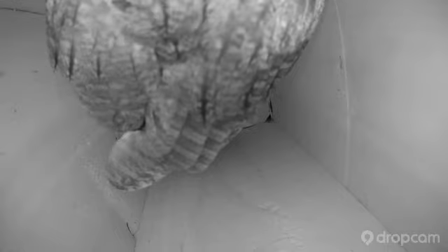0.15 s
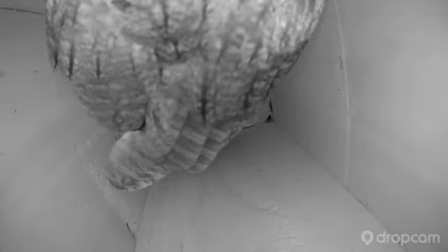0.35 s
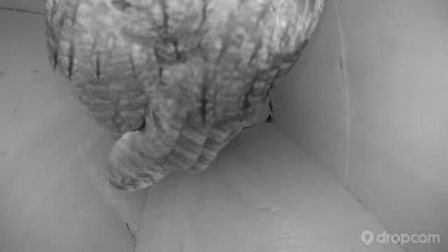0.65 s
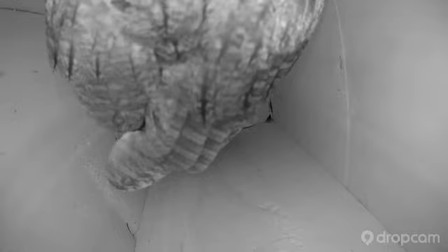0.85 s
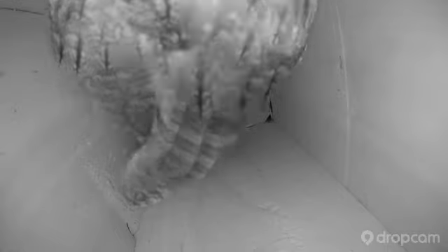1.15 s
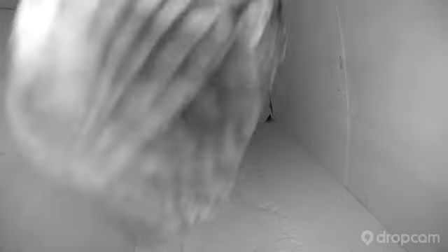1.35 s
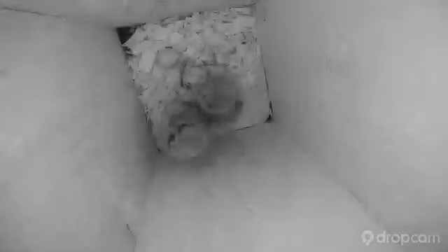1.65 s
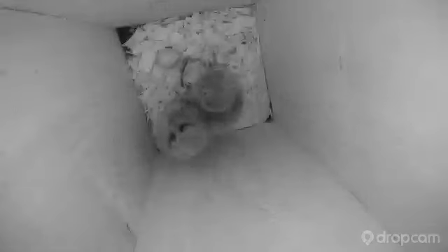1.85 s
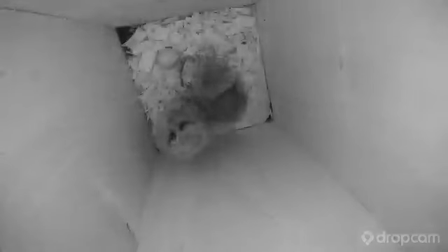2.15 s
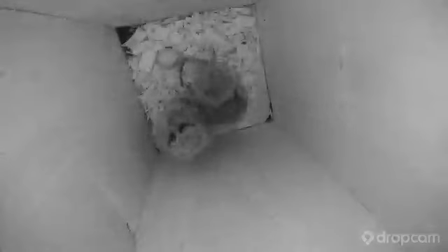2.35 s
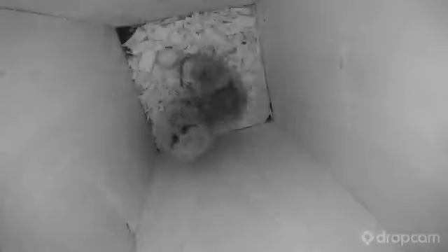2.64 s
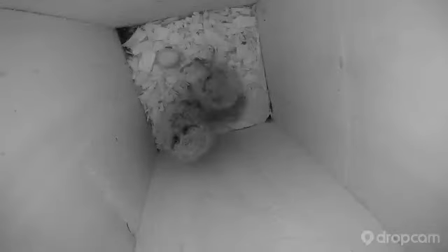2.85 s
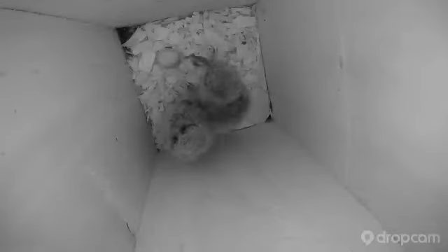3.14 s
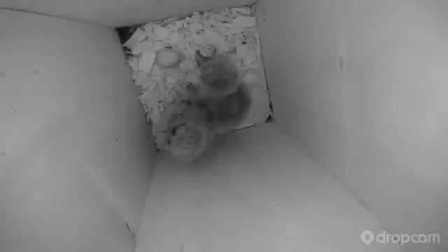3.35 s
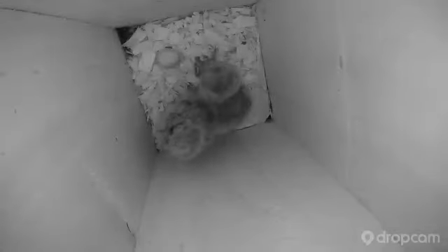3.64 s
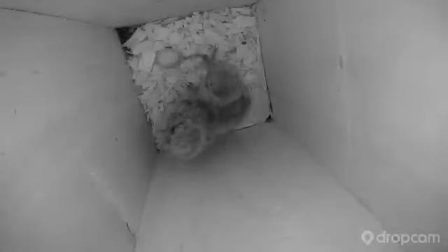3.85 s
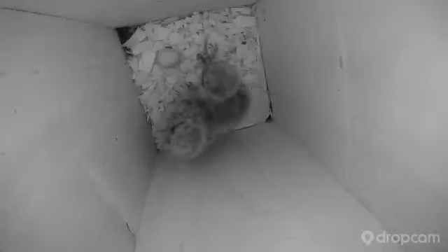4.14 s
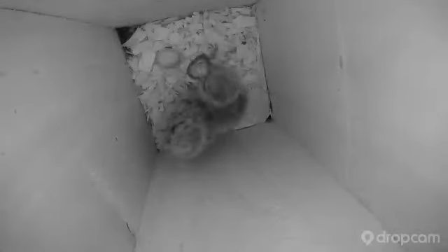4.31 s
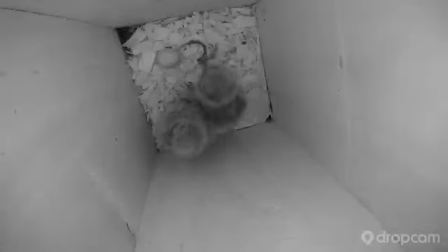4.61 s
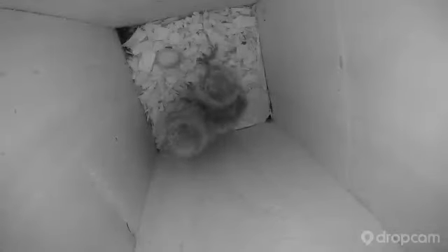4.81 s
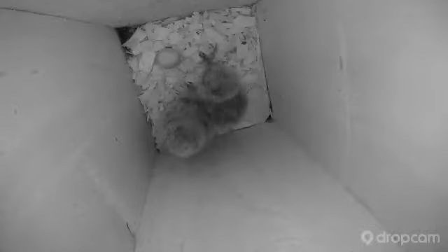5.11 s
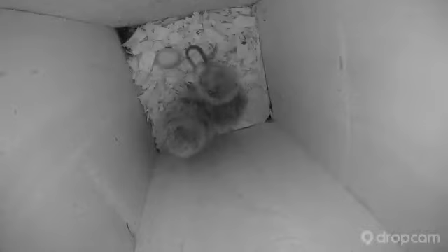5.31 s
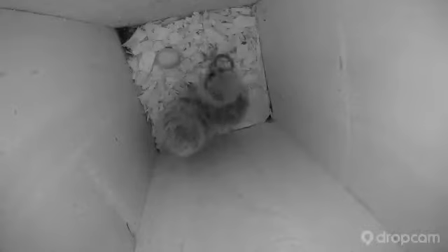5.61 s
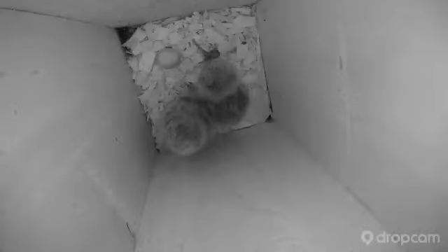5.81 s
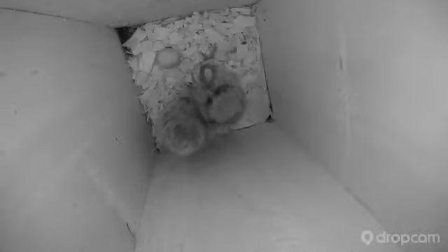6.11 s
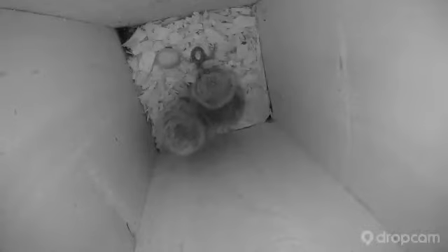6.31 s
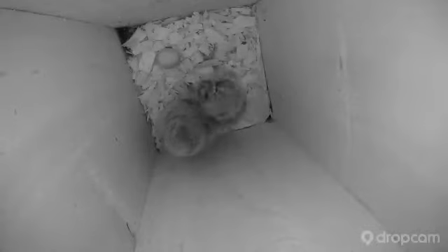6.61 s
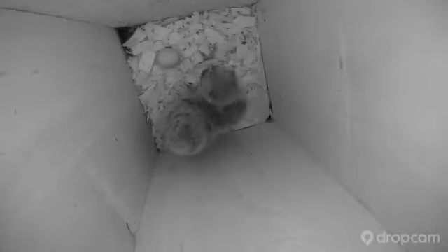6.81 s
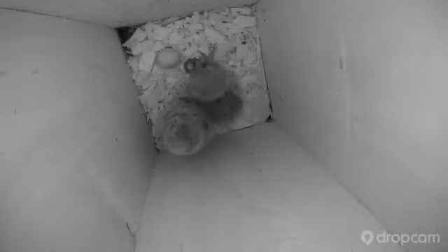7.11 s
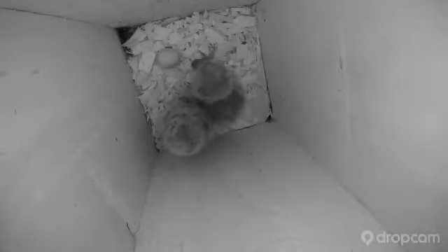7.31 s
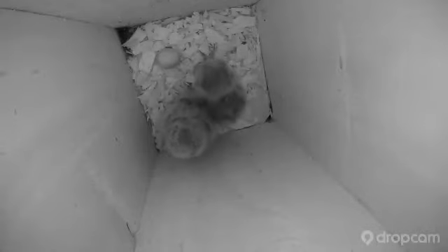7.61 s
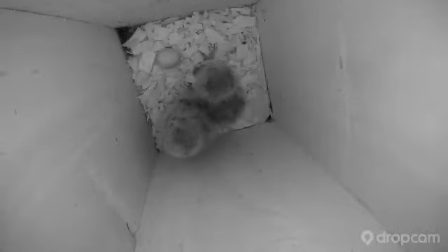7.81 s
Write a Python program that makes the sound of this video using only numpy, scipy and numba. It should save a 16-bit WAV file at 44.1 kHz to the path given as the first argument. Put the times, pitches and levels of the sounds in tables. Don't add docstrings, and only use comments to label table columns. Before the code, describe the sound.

Feathers rustle and thump as a parent bird leaves a wooden nest box, then owlets give three raspy begging hisses amid small scuffs.

```python
import sys
import numpy as np
from scipy import signal
from scipy.fft import rfft, irfft, dct, next_fast_len
from scipy.io import wavfile
from scipy.ndimage import uniform_filter1d
from numba import njit

SR = 44100
rng = np.random.default_rng(int(sys.argv[2]) if len(sys.argv) > 2 else 0)


def gain_from_db(level_db):
    decades = np.asarray(level_db, float) / 20
    return 10 ** decades


def wrap_up_sound(samples):
    columns = np.atleast_2d(samples).T
    tamed = np.clip(columns, -1, 1)
    steps = np.round(tamed * 32767).astype(np.int16)
    wavfile.write(sys.argv[1], SR, steps)


N = 351036
TIME = np.arange(N) / SR

# (frequency [Hz], level [dB])
HISS_SPECTRUM = [(12, -60), (20, -27.5), (339, -20.5), (455, -12), (541, -15.5), (1080, -19), (1280, -17.5),
                 (1520, -17.5), (2430, -18.5), (3340, -14.5), (3780, -19), (6650, -29), (7160, -37.5),
                 (9310, -47.5), (15800, -120)]


def begging_chick():
    # (frequency [Hz], width [Hz], level [dB])
    hiss_modes = [(1267, 41, -5), (2451, 110, -2.5), (2847, 90, -4), (3130, 110, -1.5), (3530, 10, -17.5),
                  (3600, 44, -12), (3920, 89, -4.5), (4220, 13, -29), (4530, 240, -7.5), (5350, 42, -11),
                  (5384, 150, -11), (5760, 120, -14.5), (6553, 300, -15)]
    # (frequency [Hz], width [Hz], level [dB])
    boom_modes = [(451.3, 52, -1), (301.6, 69, -20)]
    # (frequency [Hz], width [Hz], level [dB])
    lean_modes = [(952, 170, 0)]
    # (frequency [Hz], width [Hz], level [dB])
    cross_modes = [(1280, 110, 0)]

    (hiss, boom, throat, lean), throat_hz, upper_hz = breath()
    flutter = noise() * gain_from_db(2.9 * walk(260))
    wheeze = noise() * gain_from_db(3 * walk(260))

    broad = gain_from_db(-1.8) * colour(flutter, HISS_SPECTRUM)
    broad = broad + gain_from_db(-5.5) * ring(flutter, hiss_modes, flicker_db=2.5)
    away = lean / (lean + 2.5 * hiss + 1e-9)
    dull = signal.lfilter(*signal.butter(1, 3500, fs=SR), broad)
    broad = (1 - away) * broad + away * dull

    cross_gain = gain_from_db(-9.5) * hiss ** 2 / (hiss + 1.5 * lean + 1e-9)
    out = cross_gain * ring(flutter, cross_modes, order=2)
    out = out + gain_from_db(-8) * hiss * throat_band(flutter, upper_hz, 160)
    out = out + gain_from_db(5.5) * hiss * broad
    out = out + gain_from_db(-1.1) * boom * ring(flutter, boom_modes, order=2)
    out = out + gain_from_db(1.0) * throat * throat_band(wheeze, throat_hz, 300)
    return out + gain_from_db(-2.5) * lean * ring(wheeze, lean_modes, order=2)


def breath():
    # (full voice [s], beak opens [s], fades [s], effort [dB])
    begs = [
        (1.985, 2.322, 2.54, -46),
        (4.666, 4.901, 5.105, -48.5),
        (7.368, 7.631, 7.692, -49),
    ]
    # (upper throat [Hz], throat before opening [dB], boom lost once open [dB/s])
    posture = [
        (3955, -2.5, 95.5),
        (3700, -2, 5.5),
        (3650, 7, 0),
    ]
    # (time [s], length [s], throat [dB], throat centre [Hz], box [dB])
    gulps = [
        (1.98, 0.0046, -49.5, 2100, -57),
        (4.644, .015, -49.5, 2365, -59.5),
        (5.16, .008, -40.5, 2150, -60.5),
        (5.18, 0.0053, -45.5, 2100, -49),
        (7.35, 0.0031, -58, 2225, -53.5),
        (7.366, .012, -45.5, 2420, -54),
        (7.72, .038, -40, 2186, -41),
        (7.794, .016, -39.5, 2230, -39),
    ]
    shut_hz, open_hz = 2420, 2267
    swell_db, gape_s, boom_lag_s = 4.5, .1, .012
    attack_db_s, fade_db_s = 3000, 550
    # hiss, boom, throat and lean mode [dB over the effort]
    shut = np.array([-0.5, 4, -9, -15])[:, None]
    wide = np.array([-3, 2, 0, -3.5])[:, None]

    gains = np.zeros((4, N))
    throat_hz = np.full(N, float(shut_hz))
    upper_hz = np.full(N, float(shut_hz))
    for (start, opens, end, db), (upper, throat_db, lost_db_s) in zip(begs, posture):
        gape = ramp(opens, gape_s)
        effort = db + swell_db * ramp(start, opens - start)
        effort = effort + shape(start, end, attack_db_s, fade_db_s)
        beg = gain_from_db(effort + shut + gape * (wide - shut))
        beg[1] *= gain_from_db(shape(start + boom_lag_s, opens, attack_db_s / 2, lost_db_s))
        beg[2] *= gain_from_db((1 - gape) * throat_db)
        gains += beg
        now = TIME > start - .1
        throat_hz[now] = (shut_hz + gape * (open_hz - shut_hz))[now]
        upper_hz[now] = upper
    for s, length, db, gulp_hz, box_db in gulps:
        levels = np.array([db - 9, box_db, db, box_db])[:, None]
        gains += gain_from_db(levels + shape(s, s + length, 3999, 901.5))
        throat_hz[(TIME > s - .01) & (TIME < s + 2 * length + .01)] = gulp_hz
    return gains, throat_hz, upper_hz


def sibling():
    # (time [s], level [dB])
    screech = [(2.27, -50.5), (2.34, -43), (2.375, -29), (2.47, -31), (2.55, -34.5), (2.588, -56.5),
               (2.602, -44), (2.63, -48), (2.66, -73)]
    # (frequency [Hz], width [Hz], level [dB])
    formants = [(2100, 380, -7.5), (2677, 160, -8), (2910, 71, -5), (3216, 350, -5), (3500, 85, -11)]
    start, end, from_db, to_db, whistle_hz = 2.41, 2.6, -8, 14.5, 2389
    rasp = noise() * gain_from_db(3.5 * walk(300))
    wheeze = noise() * gain_from_db(3 * walk(260))
    whistle_gain = gain_from_db(from_db + (to_db - from_db) * ramp(start, end - start))
    voice = ring(rasp, formants, flicker_db=2.5)
    voice = voice + whistle_gain * throat_band(rasp, whistle_hz, 160)
    voice = voice + gain_from_db(-12.5) * colour(wheeze, HISS_SPECTRUM)
    return gain_from_db(-1.3) * level_curve(screech) * voice


def parent():
    # (frequency [Hz], level [dB])
    rustle_spectrum = [(290, -28), (500, -4), (772, -5), (965, -2.5), (1510, -6), (1760, -2), (2660, -5),
                       (2870, -10.5), (3250, -4.5), (7160, -26.5), (9310, -61), (15800, -120)]
    # (time [s], length [s], box boom [dB], wall thump [dB])
    bumps = [
        (1.522, 0.029, -50, -67),
        (1.606, 0.017, -45.5, -64.5),
        (1.651, 0.013, -40.5, -45.5),
        (1.688, 0.0096, -43, -53),
        (3.549, .01, -57.5, -74),
        (3.807, .015, -54.5, -75),
        (6.438, .01, -59, -72),
    ]
    leaves_s, rustle_db, settle_db = 1.66, -42, -58
    growth_db_s, fall_db_s = 150, 699

    rustle = gain_from_db(rustle_db + shape(leaves_s, leaves_s, growth_db_s, fall_db_s))
    rustle = rustle + gain_from_db(settle_db + shape(leaves_s, leaves_s, growth_db_s / 3.1, fall_db_s / 7))
    boom, thump = np.zeros(N), np.zeros(N)
    for s, length, boom_db, thump_db in bumps:
        knock = shape(s, s + length, 503, 400.5)
        boom += gain_from_db(boom_db + knock)
        thump += gain_from_db(thump_db + knock)
    grains = noise() * gain_from_db(4.5 * walk(400))
    out = gain_from_db(0.9) * rustle * colour(grains, rustle_spectrum)
    out = out + boom * ring(noise(), [(431.7, 13, 0)])
    return out + gain_from_db(-0.5) * thump * ring(noise(), [(117, 22, 0), (289, 30, -9)])


def scuffs():
    # (time [s], peak [dB], colour [Hz], 60 dB decay [s])
    steps = [(2.7232, -48.5, 2000, 0.06), (2.7392, -41, 2340, 0.074), (2.7888, -49, 1730, 0.098),
             (2.9958, -49.5, 1780, 0.085), (3.1008, -52.5, 1720, 0.1), (3.145, -52.5, 4080, 0.08),
             (3.1842, -55, 2380, 0.23), (3.479, -41, 2270, 0.035), (3.5043, -43.5, 2510, 0.067),
             (3.7974, -51, 2490, 0.042), (3.8212, -48, 2470, 0.11), (4.0471, -47, 3130, 0.03),
             (4.2792, -46, 2930, 0.07), (4.2988, -46.5, 2450, 0.033), (4.3395, -49, 1880, 0.076),
             (5.2, -53.5, 2370, .04), (5.3161, -43, 2210, 0.05), (5.3374, -49.5, 2470, 0.032),
             (5.579, -57, 1650, 0.14), (5.7752, -54, 1720, 0.24), (5.8342, -48.5, 1920, 0.13),
             (6.3761, -55.5, 2200, 0.33), (6.4423, -39, 1950, 0.047), (6.8033, -48.5, 3700, 0.03)]
    rise_s = .003
    out, t = np.zeros(N), np.arange(SR // 4) / SR
    for s, db, hz, t60 in steps:
        crackle = rng.standard_normal(len(t))
        burst = (1 - np.exp(-t / rise_s)) * gain_from_db(-60 * t / max(t60, .01))
        body = signal.lfilter(*signal.iirpeak(hz, 1.6, SR), crackle)
        body = body + .15 * np.diff(crackle, prepend=0)
        i = int(s * SR)
        out[i:i + len(t)] += gain_from_db(db - 6.5) * burst / burst.max() * unit(body)
    return out


def outside_air():
    # (frequency [Hz], level [dB])
    shut_spectrum = [(12, -66), (20, -32.5), (76, -7), (154, -11), (183, -13), (383, -2.5), (412, -1.5),
                     (466, -7.5), (1640, -14), (5880, -27), (7160, -29.5), (9310, -65), (15800, -120)]
    # (frequency [Hz], level [dB])
    open_spectrum = [(12, -59), (20, -15), (79, -17), (118, -1), (202, -13.5), (356, -9), (383, -17),
                     (455, -8.5), (627, -13), (1410, -17), (1760, -14.5), (1940, -18), (4600, -28),
                     (7160, -38.5), (9310, -70), (15800, -120)]
    # (frequency [Hz], width [Hz], level [dB])
    shut_modes = [(419, 39, 1.5), (1787, 72, -11), (3390, 170, -19.5)]
    # (frequency [Hz], width [Hz], level [dB])
    open_modes = [(121.9, 33, 1.5), (435.2, 60, 1), (1720, 130, 0.5)]
    # (time [s], level [dB])
    draught = [(1.8, -70), (2.9, -71), (3.4, -75), (3.6, -88), (4.8, -83), (5.3, -72.5), (5.8, -69),
               (6, -84), (7, -84), (7.3, -69)]

    gone = ramp(1.45, 0.05)
    shut = colour(noise(), shut_spectrum) + gain_from_db(-7) * ring(noise(), shut_modes)
    sag_db = 0.29 * (TIME - 3)
    free = gain_from_db(-64 - sag_db + 3.0 + 0.79 * walk(9)) * colour(noise(), open_spectrum)
    draught_db = np.interp(TIME, *np.transpose(draught))
    for mode, db in zip(open_modes, (-71.5, -68, draught_db)):
        gust_db = 3 * walk(4)
        free = free + gain_from_db(db + mode[2] + gust_db) * ring(noise(), [mode], order=2)
    drone = gain_from_db(-71) * ring(noise(), [(183, 20, 0)], order=2) / (1 + np.exp((TIME - .45) / .05))
    return (1 - gone) * gain_from_db(-64.5) * unit(shut) + gone * free + drone


def unit(x):
    return x / np.sqrt(np.mean(x ** 2))


def noise():
    return rng.standard_normal(N)


def walk(rate):
    k = int(SR / rate)
    held = np.repeat(rng.standard_normal(N // k + 1), k)
    return uniform_filter1d(uniform_filter1d(held, k), k)[:N]


def ramp(start, length):
    return np.clip((TIME - start) / length, 0, 1)


def shape(start, end, attack_db_s, fade_db_s):
    return -attack_db_s * np.maximum(start - TIME, 0) - fade_db_s * np.maximum(TIME - end, 0)


def level_curve(table):
    s, db = np.transpose(table)
    return uniform_filter1d(gain_from_db(np.interp(TIME, s, db, left=-120, right=-120)), size=90)


def colour(x, points):
    hz, db = np.transpose(points)
    size = next_fast_len(N)
    f = np.arange(size // 2 + 1) * SR / size + 1
    gain = gain_from_db(np.interp(np.log(f), np.log(hz), db, right=-90))
    return unit(irfft(rfft(x, size) * gain, size)[:N])


def ring(x, modes, order=1, flicker_db=0.):
    out = 0
    for k, (hz, width, db) in enumerate(modes):
        b, a = signal.iirpeak(hz, hz / width, SR)
        if flicker_db:
            db = db + flicker_db * walk(9)
        out = out + (-1) ** k * gain_from_db(db) * signal.sosfilt([np.r_[b, a]] * order, x)
    return unit(out)


def throat_band(x, hz, width):
    centre = hz * (1 + .02 * walk(40))
    band = glide(glide(x, centre, 2. * width), centre, 1. * width)
    return unit(gain_from_db(1.5 * walk(45)) * band)


@njit
def glide(x, hz, width):
    y, band, low = np.empty(len(x)), 0., 0.
    for i in range(len(x)):
        g, k = np.tan(np.pi * hz[i] / SR), width / hz[i]
        v = (band + g * (x[i] - low)) / (1 + g * (g + k))
        band = 2 * v - band
        low = low + 2 * g * v
        y[i] = k * v
    return y


def scene():
    return (begging_chick() + sibling() + parent() + scuffs() + outside_air())[None]


def camera(x):
    hop, offset = 2822, 1745
    step_db, whim_db, from_hz, slack = 4.8, 3, 900., .45
    deaf_db, deaf_hz, slope_db = -78, 6574.0, 28

    slow = np.sqrt(uniform_filter1d(uniform_filter1d(x ** 2, hop), hop)) + 1e-6
    fast = np.sqrt(uniform_filter1d(uniform_filter1d(x ** 2, size=300), size=300)) + 1e-6
    jump = np.log(fast / slow)
    follow = slow * np.exp(jump - np.clip(jump, -slack, slack))
    pad = np.pad(x / follow, (2 * hop - offset, 3 * hop))
    window = np.sin(np.pi * (np.arange(2 * hop) + .5) / (2 * hop))
    frames = np.lib.stride_tricks.sliding_window_view(pad, 2 * hop)[::hop] * window
    a, b, c, d = np.split(frames, 4, axis=1)
    lines = dct(np.hstack([-c[:, ::-1] - d, a - b[:, ::-1]]), type=4, norm="ortho")

    hz = (np.arange(hop) + .5) * SR / (2 * hop)
    local = np.sqrt(np.maximum(uniform_filter1d(lines ** 2, size=90, axis=1), 1e-18))
    whim = rng.standard_normal((len(lines), hop // 17))
    whim = np.sqrt(3) * uniform_filter1d(whim, size=2, axis=0) / 1.2
    step = local * gain_from_db(step_db + .6 * hz / 1000 + whim_db * np.repeat(whim, 17, axis=1))
    step = step * np.clip(hz / (2 * from_hz), .1, 1)
    lines = step * np.sign(lines) * np.floor(np.abs(lines) / step + .4)

    centres = offset + hop * (np.arange(len(lines)) - 1)
    loud = np.interp(centres, np.arange(N), uniform_filter1d(follow, hop))
    edge_hz = deaf_hz + 240 * rng.standard_normal((len(lines), 1))
    threshold = gain_from_db(deaf_db + slope_db * np.clip((hz - edge_hz) / 1000, -1, 2))
    lines = lines * (local * loud[:, None] > threshold)

    u, v = np.split(dct(lines, type=4, norm="ortho"), 2, axis=1)
    back = np.hstack([v, -v[:, ::-1], -u[:, ::-1], -u]) * window
    out = np.pad(back[:, :hop], ((0, 1), (0, 0))) + np.pad(back[:, hop:], ((1, 0), (0, 0)))
    return out.ravel()[2 * hop - offset:][:N] * follow


def starve(x):
    # (from [s], to [s])
    spans = [
        (1.93, 1.975),
        (4.612, 4.66),
        (6.415, 6.475),
        (7.30, 7.362),
    ]
    hz, s, cells = signal.stft(x, SR, nperseg=704)
    lucky = np.repeat(rng.random((len(hz) // 8 + 1, len(s))), 8, axis=0)[:len(hz)] < .35
    strong = uniform_filter1d(np.abs(cells), size=8, axis=0) > gain_from_db(-80)
    near_attack = sum((s > start) & (s < end) for start, end in spans)
    hit = near_attack * (hz[:, None] > 2100)
    return signal.istft(cells * np.where(hit, lucky | strong, 1), SR, nperseg=704)[1][:N]


def low_pass(x):
    return signal.sosfilt(signal.butter(12, 7310, fs=SR, output="sos"), x)


def record(dry):
    top = signal.ellip(10, .3, 80, 7500, fs=SR, output="sos")
    heard = signal.sosfilt(top, starve(camera(dry[0])))
    mix = (heard + gain_from_db(-99.5) * noise())[None]
    return low_pass(mix)


dry = scene()
out = record(dry)
wrap_up_sound(out)
```